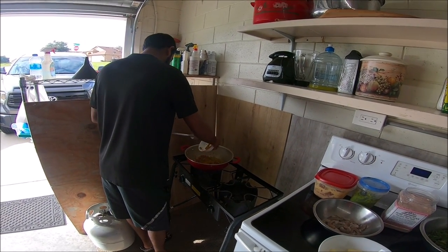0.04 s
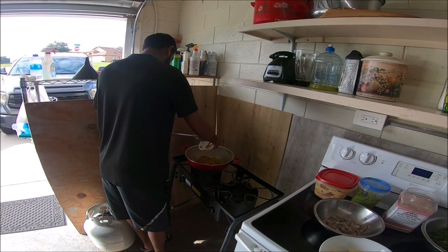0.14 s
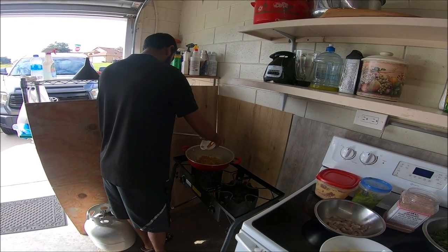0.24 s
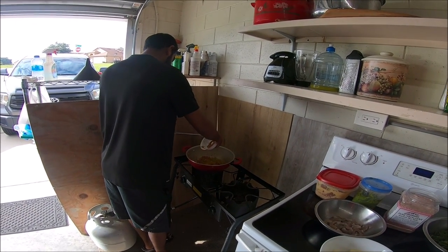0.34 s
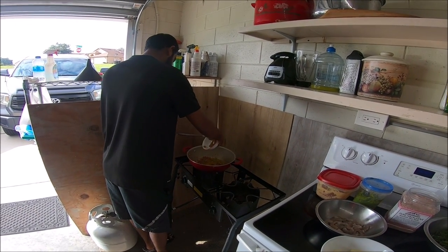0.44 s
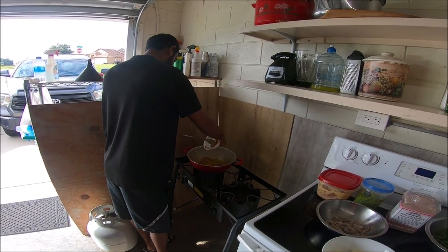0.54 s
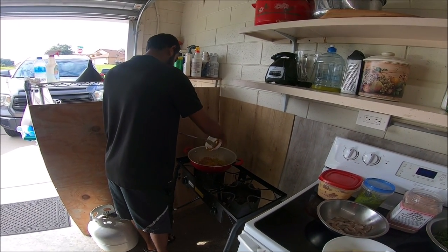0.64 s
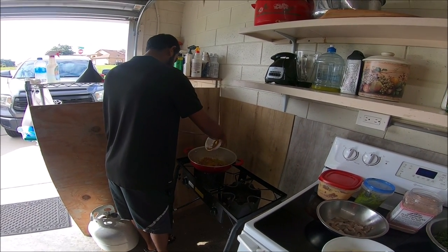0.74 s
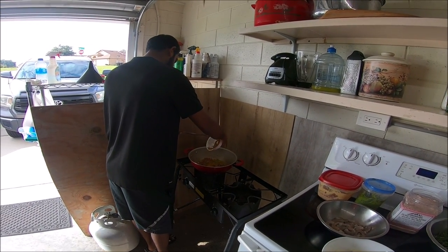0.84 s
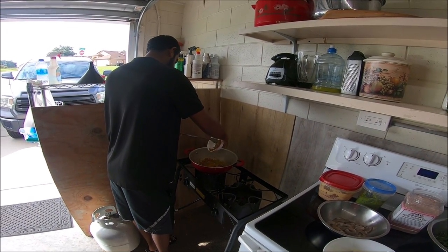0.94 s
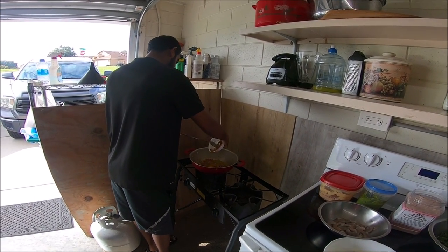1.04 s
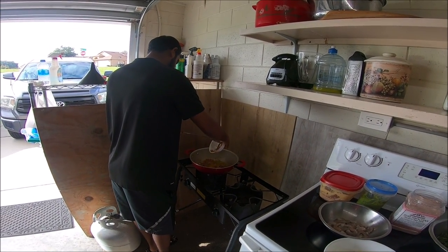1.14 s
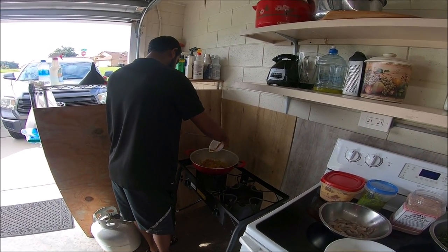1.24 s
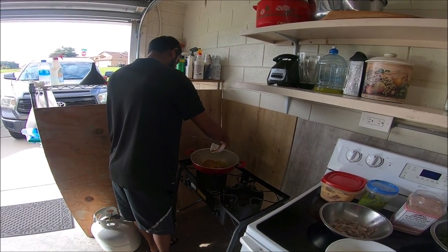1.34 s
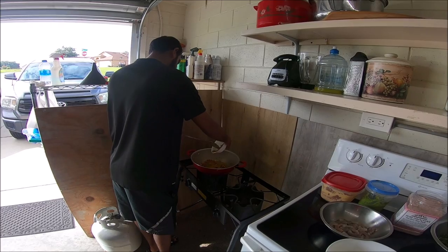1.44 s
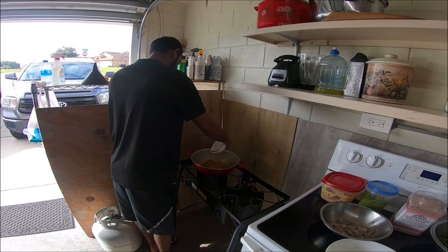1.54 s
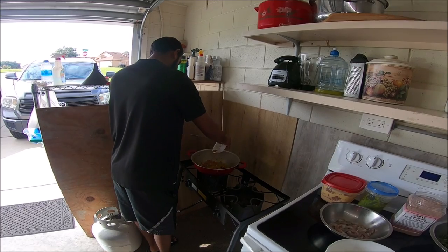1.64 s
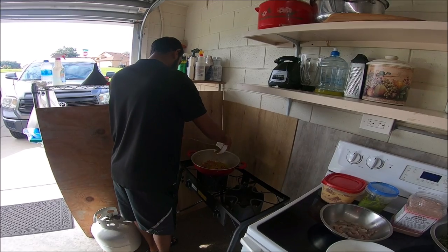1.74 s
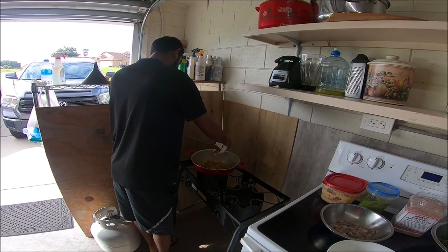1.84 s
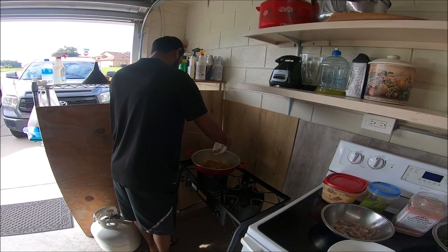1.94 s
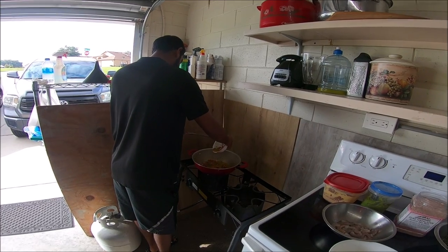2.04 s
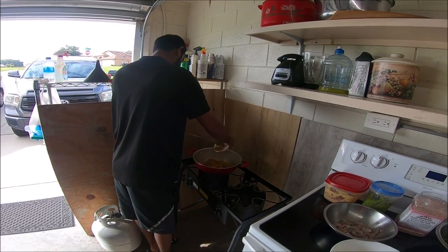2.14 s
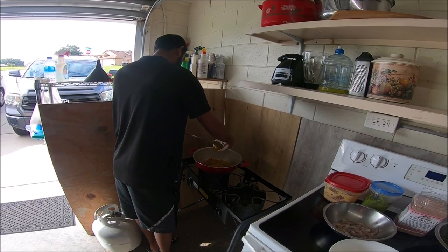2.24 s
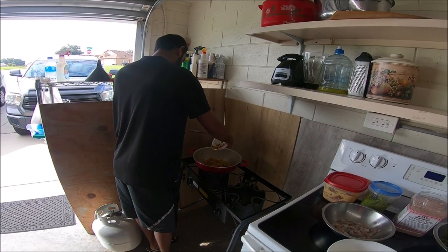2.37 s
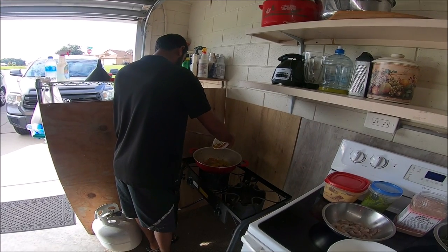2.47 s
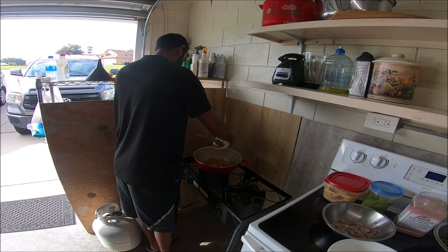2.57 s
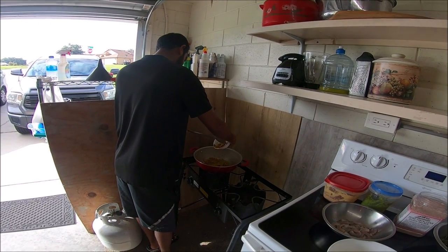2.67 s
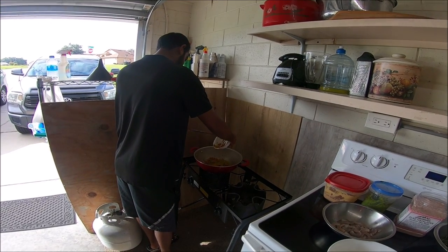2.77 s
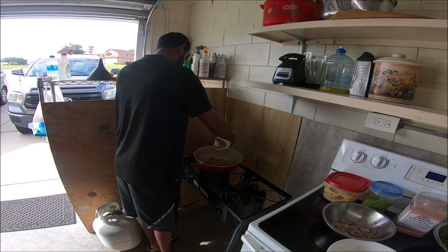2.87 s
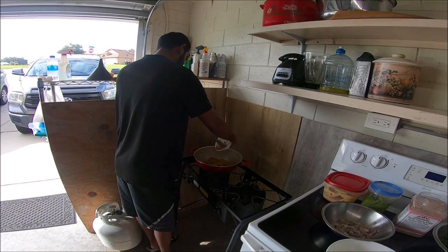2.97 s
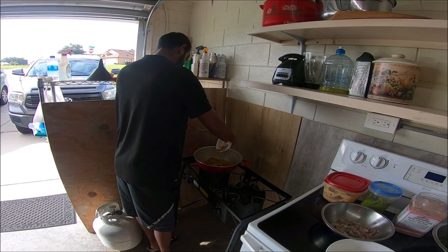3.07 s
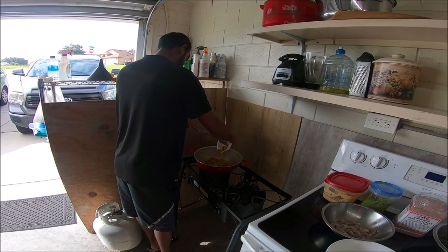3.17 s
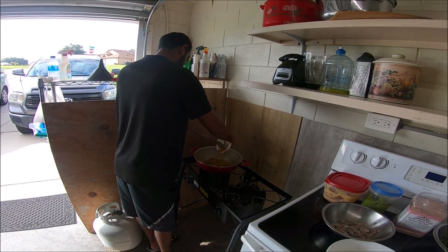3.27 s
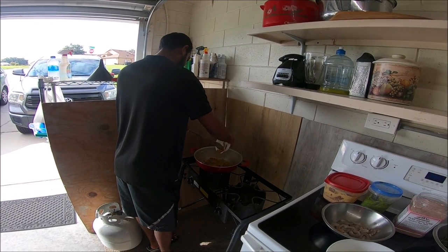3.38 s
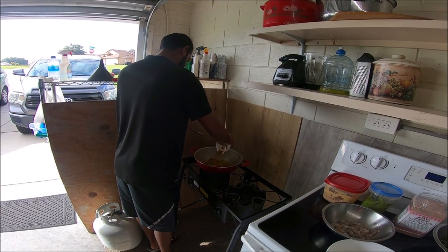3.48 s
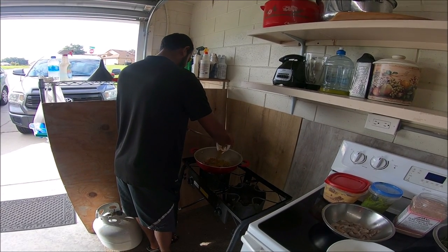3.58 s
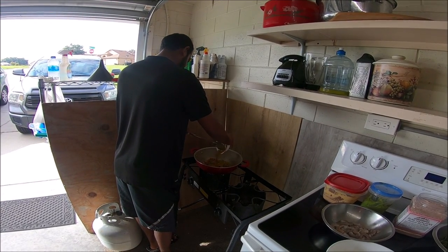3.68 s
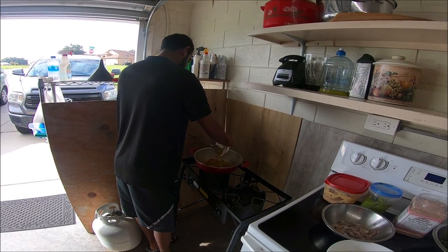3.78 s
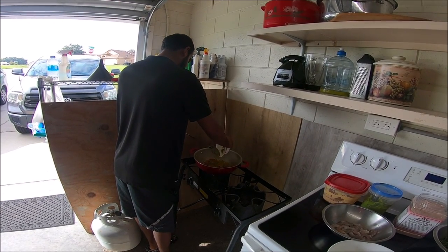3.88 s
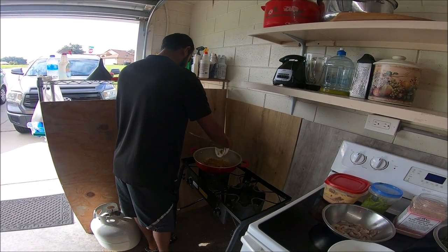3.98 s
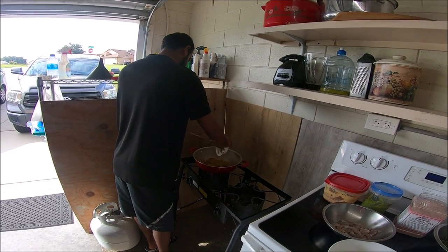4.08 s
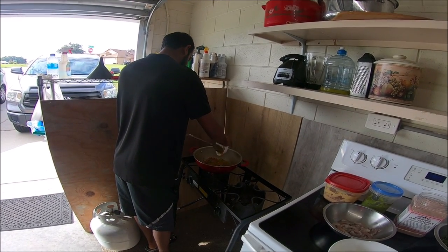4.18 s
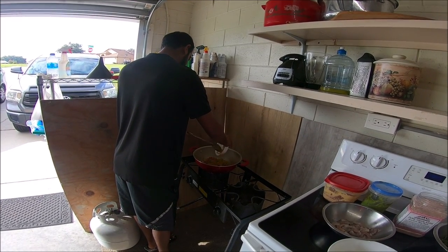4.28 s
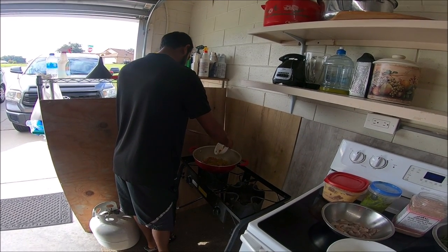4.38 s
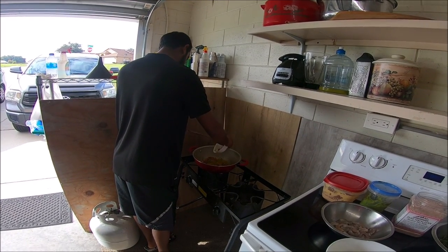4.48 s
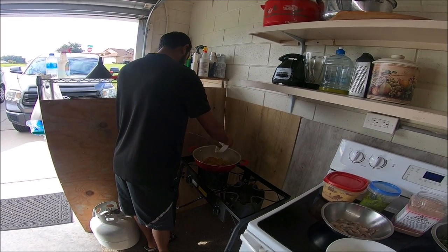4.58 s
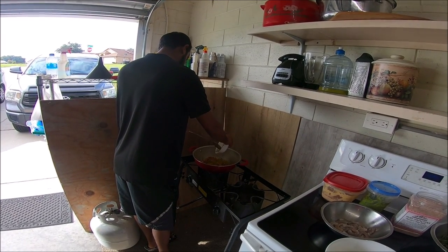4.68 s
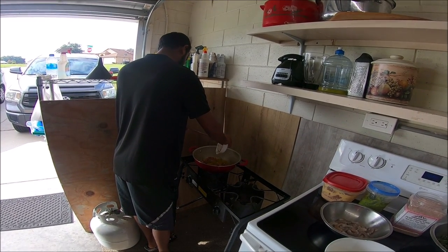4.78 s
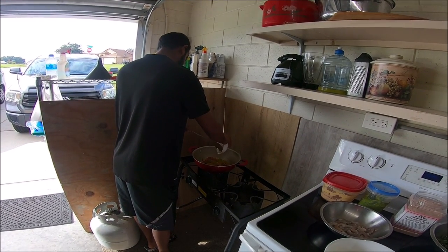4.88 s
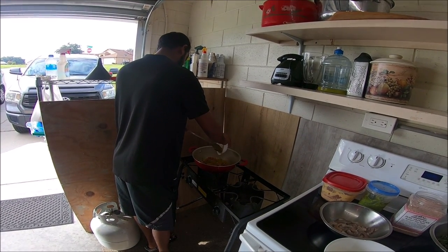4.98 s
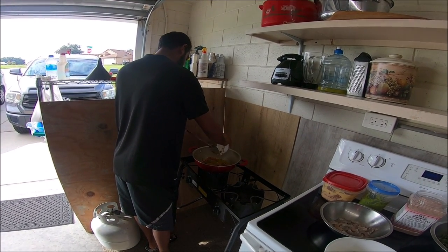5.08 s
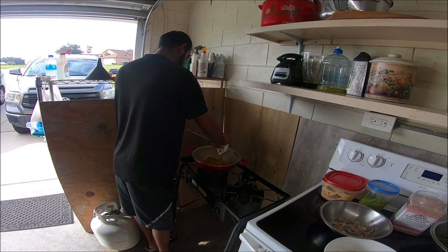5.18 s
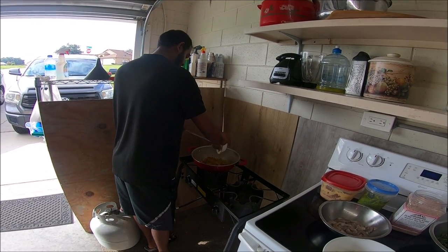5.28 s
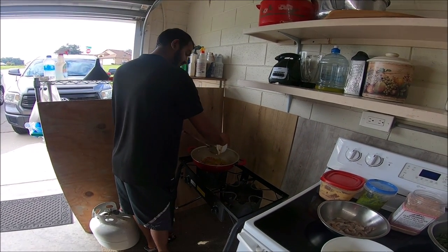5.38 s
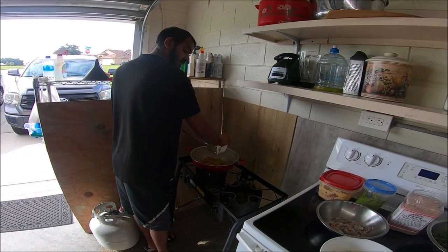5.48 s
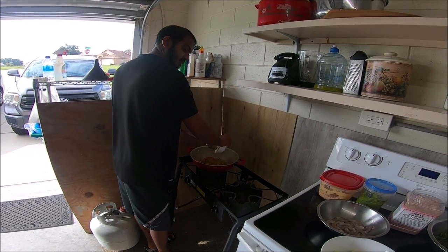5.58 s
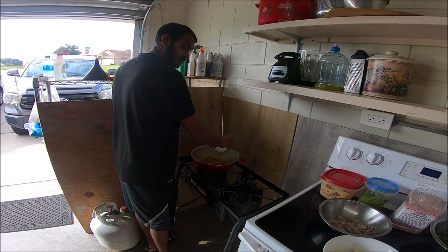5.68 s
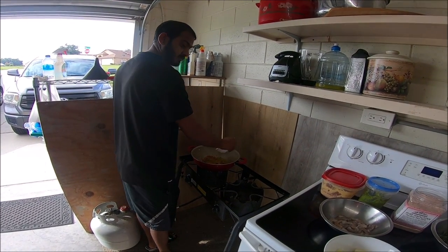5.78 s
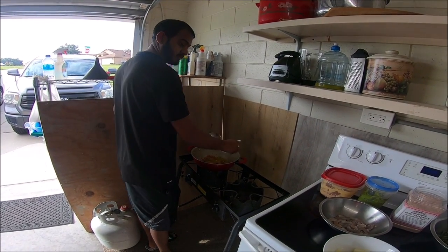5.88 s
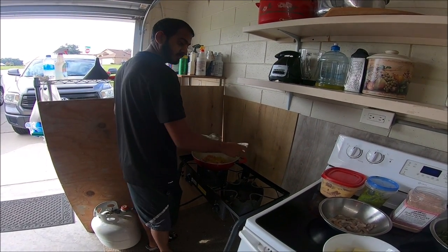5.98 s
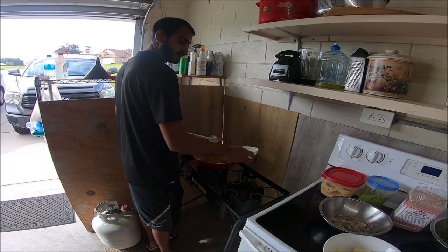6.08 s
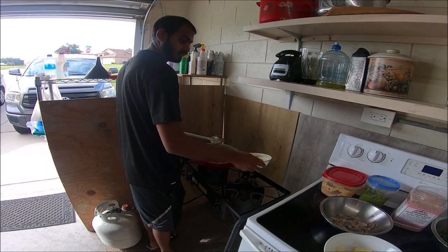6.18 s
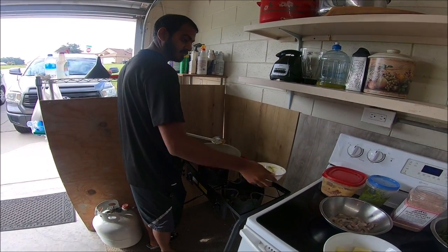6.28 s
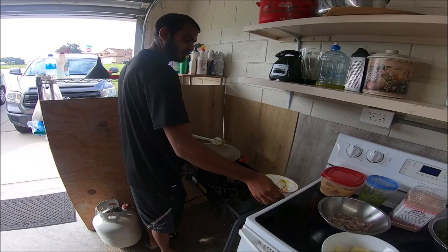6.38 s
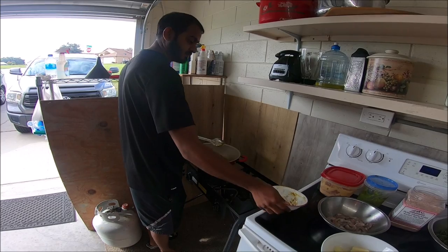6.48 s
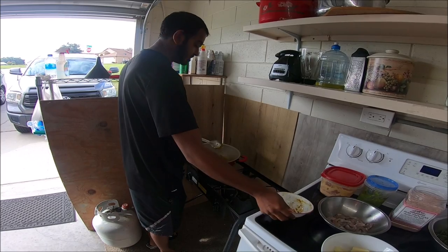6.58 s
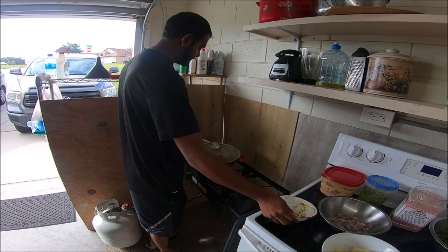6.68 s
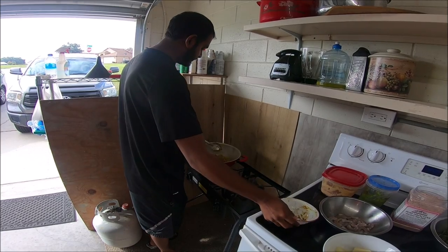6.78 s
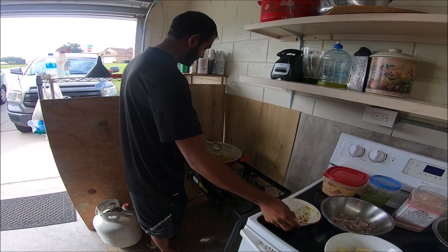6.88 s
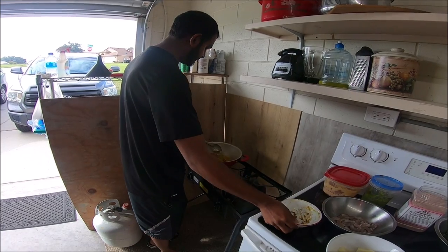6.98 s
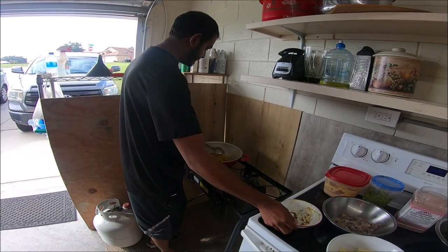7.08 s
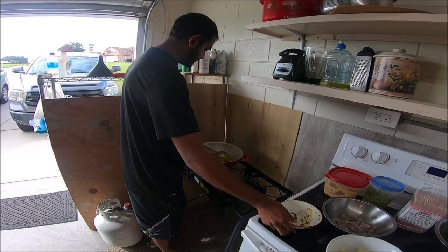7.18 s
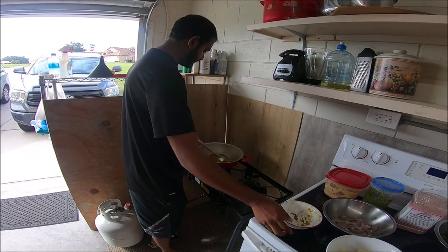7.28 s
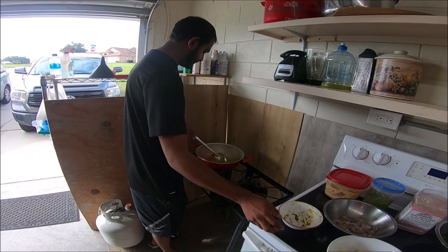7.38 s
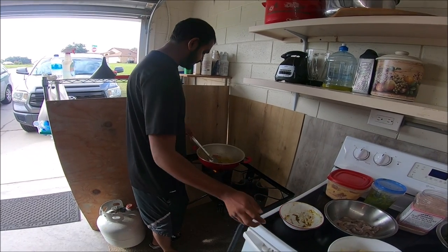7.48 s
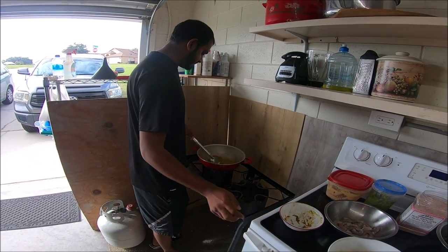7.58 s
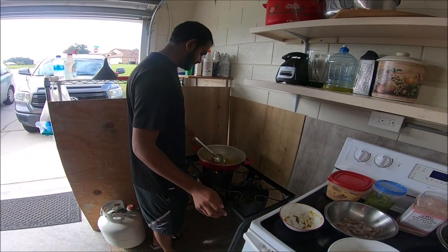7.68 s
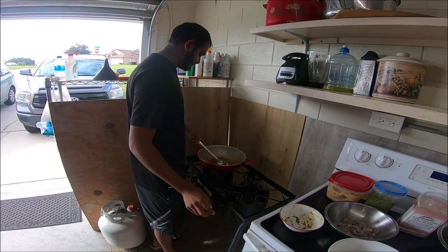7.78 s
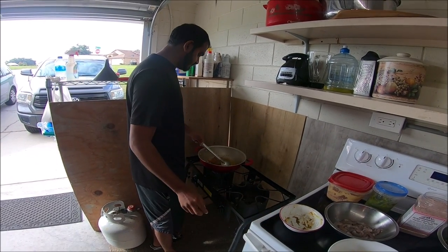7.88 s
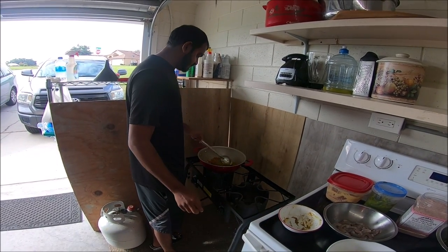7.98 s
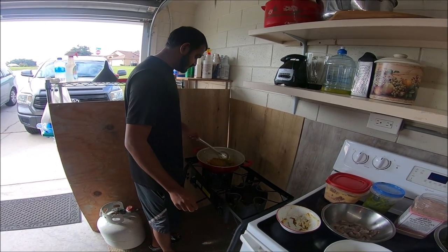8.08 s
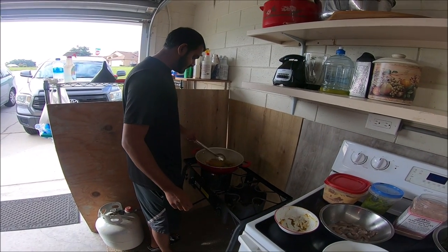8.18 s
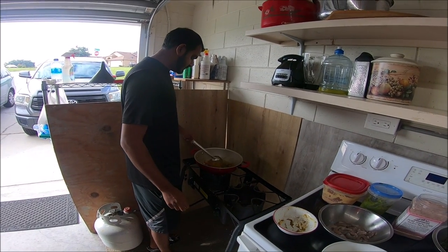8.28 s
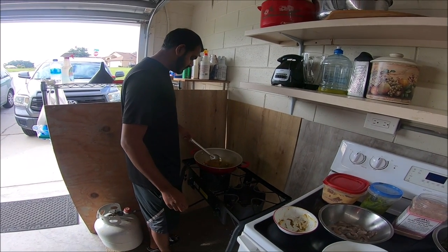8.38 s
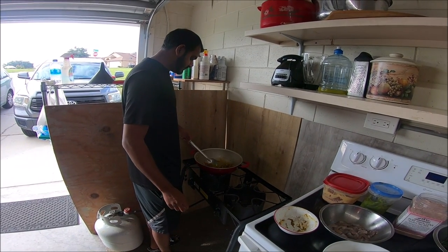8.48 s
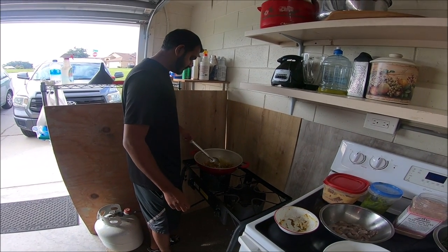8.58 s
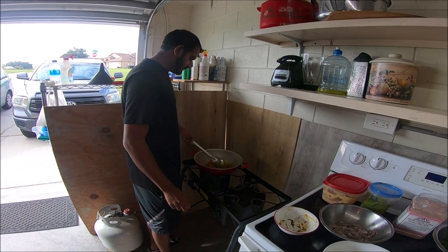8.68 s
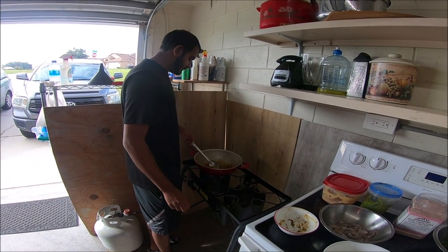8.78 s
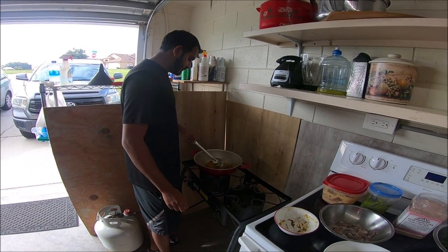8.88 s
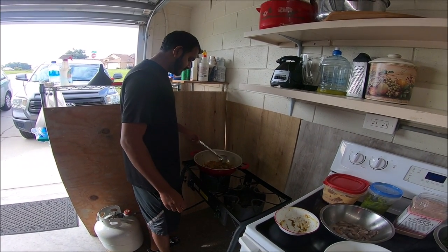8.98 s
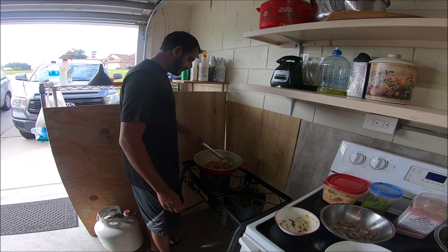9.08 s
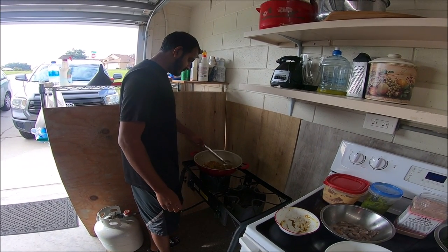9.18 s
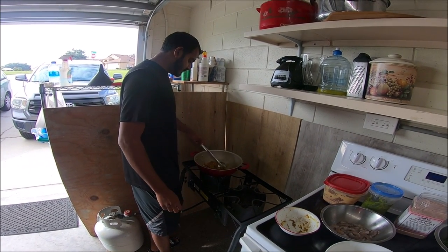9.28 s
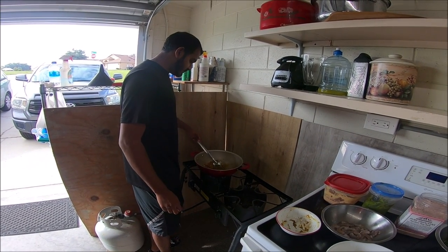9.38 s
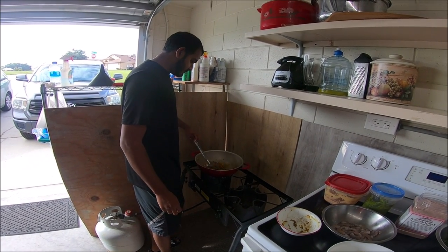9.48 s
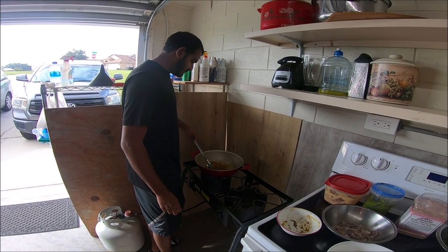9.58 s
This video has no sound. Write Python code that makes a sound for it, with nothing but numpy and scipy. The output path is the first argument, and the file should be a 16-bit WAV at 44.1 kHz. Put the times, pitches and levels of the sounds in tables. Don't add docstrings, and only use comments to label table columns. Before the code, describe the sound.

A nearby stereo microphone hears oil frying with a dense, crackly hiss, and a spoon clanging against a steel pan at uneven intervals. The tapping stops before six seconds; the sizzle dips, rubber soles chirp on concrete, and a plate clacks down with a metallic rattle, settling softly afterwards. From about eight seconds the sizzling is stronger, ending with a short dull spoon drag. The small hard-walled garage adds a short echo over faint low rumble.

```python
import sys
import numpy as np
from scipy import signal
from scipy.fft import rfft, irfft
from scipy.io import wavfile
from scipy.ndimage import uniform_filter1d

SR = 44100
rng = np.random.default_rng(int(sys.argv[2]) if len(sys.argv) > 2 else 0)


def materialize(psi):
    bounded = np.clip(np.atleast_2d(psi).T, -1, 1)
    quanta = np.round(bounded * 32767).astype(np.int16)
    wavfile.write(sys.argv[1], SR, quanta)


def ratio(d):
    e = np.asarray(d, float) / 20
    return 10 ** e


N = 424683
T = np.arange(N) / SR


def level(x, db=0):
    return x * ratio(db) / np.sqrt(np.mean(x ** 2))


def on_log(hz, table):
    f, v = np.transpose(table)
    return np.interp(np.log(np.maximum(hz, 1)), np.log(f), v)


def colour(x, table):
    n = x.shape[-1]
    gain = ratio(on_log(np.fft.rfftfreq(n, 1 / SR), table))
    return irfft(rfft(x) * gain, n)


def band(x, hz, width):
    return signal.lfilter(*signal.iirpeak(hz, hz / width, fs=SR), x)


def walk(rate):
    k = int(SR / rate)
    held = np.repeat(rng.standard_normal(N // k + 1), k)
    return uniform_filter1d(uniform_filter1d(held, k), k)[:N]


def ring(modes, tint_db, scatter_db, t):
    hz, db, t60 = np.transpose(modes)[:, :, None]
    chance = rng.standard_normal((2, len(modes), 1))
    steps = np.repeat(rng.standard_normal((len(modes), len(t) // 300 + 1)), 300, axis=1)[:, :len(t)]
    waver_db = 3 * uniform_filter1d(steps, size=300) * np.minimum(t / 0.01, 1) * np.minimum(hz / 1000, 1)
    decay_db = db + tint_db + scatter_db * chance[0] + waver_db - 60 * t / t60
    return np.sum(ratio(decay_db) * np.sin(2 * np.pi * hz * t + 0.5 * chance[1]), axis=0)


def add(out, s, sound, peak_db, pan_db):
    i = int(s * SR)
    sides = ratio(peak_db + np.array([[pan_db], [-pan_db]]) / 2)
    out[:, i:i + len(sound)] += sides * sound / np.abs(sound).max()


def frying():
    # t/s, fizz level/dB, simmer level below 2 kHz/dB, brightness above 3.5 kHz/(dB per octave)
    heat = [(0.0, -42.5, -51.5, -0.5), (0.37, -43.5, -48, -0.5), (0.62, -44.5, -51.5, -0.5),
            (0.96, -43.5, -51, -0.5), (1.98, -44.5, -50, 0.0), (2.71, -44.5, -52, -1), (3.24, -43, -47, -1),
            (3.46, -45.5, -49.5, -0.5), (3.91, -45.5, -51.5, 0.5), (4.58, -44.5, -50.5, -0.5),
            (5.66, -44.5, -51, -0.5), (6.03, -47, -52.5, 0.5), (6.89, -46, -52, 0.0), (7.11, -46, -50, 1),
            (7.51, -44.5, -53, 2.5), (7.72, -44, -51, 1.5), (7.89, -40.5, -51, -1), (8.39, -39, -49, 0.5),
            (8.98, -41, -50.5, 1), (9.33, -39.5, -51.5, -0.5), (9.63, -43, -51.5, 2.5)]
    # f/Hz, level/dB
    fizz = [(250, -13), (420, -14), (600, -8), (850, -5.5), (1300, -3.5), (1800, -3), (2700, -1.5),
            (4200, -1), (5600, -4.5), (7650, 0), (8500, -8), (10300, -12.5), (11200, -20.5), (15500, -31)]
    # f/Hz, side minus mid level/dB
    fizz_side = [(60, -14), (110, -14), (200, 2), (380, -4.5), (700, -7), (1290, -3), (2380, -8),
                 (4400, -10.5), (8120, -0.5), (15000, 0.5)]
    s, fizz_db, simmer_db, bright_db = np.transpose(heat)
    out, swell = np.zeros((2, N)), walk(9.8)
    for hz in 280 * 2 ** np.arange(0, 5.9, 1 / 3):
        struck = rng.random((2, N)) < 0.3 * hz / SR
        pops = struck * ratio(1.8 * rng.exponential(size=N)) * rng.standard_normal((2, N))
        bubbles = band(rng.standard_normal((2, N)) + level(pops, -1), hz, hz / 4)
        share = np.clip(np.log2(hz / 1500) + 0.12, 0, 1)
        change_db = share * (fizz_db - fizz_db.mean()) + (1 - share) * (simmer_db - simmer_db.mean())
        heat_db = np.interp(T, s, change_db + bright_db * max(np.log2(hz / 3500), 0))
        out += ratio(heat_db + 0.28 * swell + 2.3 * walk(25)) * bubbles
    mid, side = level(colour(out, fizz), np.mean(fizz_db) + 1.5)
    side = colour(side, fizz_side)
    return np.array([mid + side, mid - side]) * ratio(np.array([[-0.2], [0.2]]))


def spoon_taps():
    # t/s, peak level/dB, lowest mode level/dB, share of free ring time
    taps = [(0.286, -7.5, -12, 1), (0.5, -20, -8, 0.65), (0.912, -23, 0, 0.65), (1.324, -7.5, -8.5, 0.74),
            (1.375, -18, -10, 0.8), (1.707, -20, -17, 0.8), (1.748, -17, -13, 0.96), (1.809, -18.5, -3, 1),
            (1.844, -26.5, -5, 0.95), (2.104, -21.5, -9, 0.64), (2.298, -9, -8, 1), (2.887, -14, -15, 0.67),
            (2.984, -30.5, 5, 0.69), (3.194, -9, -11, 0.8), (3.263, -17, -7, 0.84), (3.362, -14, -8, 0.69),
            (3.665, -7.5, -12, 0.93), (4.136, -9.5, -9, 0.99), (4.553, -25.5, 15, 0.54),
            (4.628, -10.5, -9, 0.68), (4.687, -21, -6.5, 0.8), (4.946, -11, -4, 0.63),
            (5.378, -13, -6, 0.76), (5.737, -7, -18.5, 1), (5.79, -20, -18, 0.7)]
    # f/Hz, level/dB, t60/s
    pan = [(676, 0, 0.1), (870, -17, 0.073), (1000, -28, .1), (1250, 1.5, 0.45), (1378, 5.5, 0.19),
           (1600, -28, 0.11), (1710, 8, 0.21), (2200, -22.5, 0.11), (2340, -11.5, .18), (2790, -51.5, 0.17),
           (3030, -33, 0.16), (2960, -28.5, 0.25), (3216, 10.5, 0.24), (3420, -17, 0.29),
           (3090, -21.5, 0.05), (3830, -39.5, .14), (4240, 3, 0.057), (4200, -10, .15), (4880, -1, 0.13),
           (4930, -8, 0.6), (4870, 19, 0.1), (5210, -34, .16), (5930, -26, .25), (6240, 1, 0.16),
           (7300, 16, 0.094), (6740, 10, 0.17), (6530, -2, 0.1), (7100, 0, 0.18), (7560, 8, 0.31),
           (8570, 5, 0.18)]
    # f/Hz, level/dB
    crack = [(300, -24), (450, -26), (620, 12.5), (1500, -2), (3000, -0.5), (5000, 1), (8000, -6),
             (9000, -9.5), (15000, -11)]
    spots_hz = [(1660, 2870, 3100, 4950, 7430), (1380, 2540, 2950, 4380, 5840),
                (1310, 2820, 2990, 4310, 6310), (1720, 2950, 3770, 4870, 5920),
                (1020, 2290, 3100, 4200, 7010), (1530, 2860, 3250, 4990, 7500),
                (1010, 2290, 3150, 5010, 7470), (1000, 2380, 3170, 5040, 7490),
                (1530, 2240, 3140, 4630, 6660), (1330, 2260, 3040, 4900, 7240),
                (1000, 2710, 3300, 4910, 7470), (1320, 2800, 3840, 5220, 6270),
                (1220, 2870, 3160, 5290, 6100), (1730, 2370, 3150, 4890, 7350),
                (1010, 2890, 3240, 4140, 6440), (1010, 2710, 3180, 4870, 7150),
                (1550, 2900, 3140, 4870, 6870), (960, 2830, 3170, 4870, 6680),
                (1720, 2190, 3090, 4280, 7920), (850, 2820, 3020, 4870, 6010),
                (1300, 2830, 3090, 4310, 7590), (1620, 2780, 3140, 5170, 6070),
                (1670, 2230, 3020, 4370, 7530), (1590, 2590, 3120, 4330, 6750),
                (1600, 2800, 3150, 4900, 6750)]
    spots_db = [(-13.5, -1, -1, -3, -4.5), (-2.5, -4, 0, -5, -2.5), (4, 3, -5, -12, -15),
                (-14, 0.5, 1, -7, 2.5), (-5, -2.5, -9, -8, -1.5), (-10, -14, -9.5, -13, 0.5),
                (-11, 1, -3, -5, 1.5), (-1.5, -1.5, -1, -4, -4), (5, -5, -3, -4, -8),
                (-23, -8, -10, -10, -6), (-12.5, -3.5, -5, -5.5, -7.5), (-10.5, -1.5, -15, -13, -14),
                (3, 14, 12, 0, -2), (-19, -7, 1, -7, 0), (-9, -2, -2, -8, -12), (-3, 6.5, 1.5, -2, 1.5),
                (-7.5, -3, -0.5, -5.5, -0.5), (-18, -1.5, 1.5, -7.5, -0.5), (-9, -6, -1, -8, -16),
                (2, -0.5, -2, -9, -6), (5.5, -4, 0, -6, -9), (-9, 4.5, 0.5, 1.5, -2),
                (-14, 0, -2.5, -1.5, -1), (-7, -2, -0.5, -9, -2.5), (-5, -3, -5, -6, -3)]
    out, t = np.zeros((2, N)), np.arange(SR // 3) / SR
    for (s, db, thud_db, free), picks, picks_db in zip(taps, spots_hz, spots_db):
        zones = [(pan[0][0], thud_db), *zip(picks, picks_db)]
        pairs = [(hz * split, g, 0.24) for hz in picks for split, g in ((1, 8), (1.013, 1))]
        modes = np.array(pan + pairs)
        modes[:, 2] *= np.clip(free, 0.05, 2)
        tones = ring(modes, on_log(modes[:, :1], zones), 1.5, t)
        hiss = level(colour(colour(rng.standard_normal(len(t)), crack), zones))
        shimmer = level(sum(band(hiss, hz, hz / 10) for hz in picks))
        noise = hiss * ratio(-9 - 60 * t / 0.035)
        noise = noise + shimmer * ratio(-17 - 60 * t / (0.2 * max(free, 0.05)))
        settle = 0.5 + 0.5 * ratio(-60 * np.maximum(t - 0.008, 0) / 0.03)
        add(out, s, tones * settle / np.abs(tones).max() + noise, db - 0.5, -0.7)
    return out


def scrapes():
    # t/s, level/dB
    drag_course = [
        (9.12, -52),
        (9.132, -68),
        (9.144, -61),
        (9.254, -50.5),
        (9.348, -37.5),
        (9.402, -43),
        (9.44, -59),
        (9.446, -67),
        (9.48, -60),
    ]
    # f/Hz, level/dB
    drag_modes = [(330, -4), (540, 0.5), (1000, -3.5), (1300, 0.5), (1730, 0), (2000, -13), (2530, -3),
                  (3050, -9), (3720, -9), (4400, -14)]
    slips = rng.standard_normal(N) * ratio(3 * walk(90))
    modes = sum(ratio(db + 5 * walk(22)) * level(band(slips, hz, 48 + hz / 14)) for hz, db in drag_modes)
    course_db = np.interp(T, *np.transpose(drag_course), -120, -120)
    return modes * ratio(course_db - 8.5 + np.array([[-1.5], [1.5]]))


def plate():
    # t/s, peak level/dB, contact time/ms, ring against rattle level/dB
    plate_hits = [
        (6.8936, -7, 0.33, -1.5),
        (7.139, -22.5, 12.4, -14),
    ]
    # f/Hz, level/dB, t60/s
    plate_modes = [(157, 4, .16), (193, -4, 0.124), (269, -14, 0.23), (386, -36, 0.088), (552, -13, 0.22),
                   (846, -24, 0.095), (899, -16, 0.091), (1240, -17, .25), (1840, -11, .15),
                   (2230, -21, .15), (2800, -22, 0.13), (3250, -3, 0.069), (3630, -28, 0.1),
                   (5310, 8, 0.041)]
    # f/Hz, level/dB
    rattle_colour = [(150, -25), (300, 3.5), (600, -5), (1000, 3), (2000, 0.5), (3300, -1), (4500, -16),
                     (8000, -20.5), (12000, -30)]
    out, t = np.zeros((2, N)), np.arange(SR // 2) / SR
    for s, db, contact_ms, ring_db in plate_hits:
        tones = ring(plate_modes, 0, 1, t)
        hiss = level(colour(rng.standard_normal(len(t)), rattle_colour))
        if contact_ms > 5:
            hiss = level(band(hiss, 660, 760))
        late = np.maximum(t - contact_ms / 1000, 0)
        rattle = hiss * (ratio(-8.5 - 60 * late / 0.033) + ratio(-16 - 60 * late / 0.41))
        onset = np.minimum(1000 * t / contact_ms, 1)
        add(out, s, (ratio(ring_db) * tones / np.abs(tones).max() + rattle) * onset, db, -4.5)
    return out


def bursting_seeds():
    # t/s, peak level/dB, f/Hz
    seed_pops = [
        (0.8375, -24.5, 7500),
        (0.9652, -28.5, 2200),
        (2.6539, -32, 3130),
        (3.1324, -41, 7780),
        (5.6431, -28, 3610),
        (5.8654, -33, 6610),
        (6.7191, -29.5, 2540),
    ]
    out, t = np.zeros((2, N)), np.arange(SR // 20) / SR
    for s, db, hz in seed_pops:
        burst = rng.standard_normal(len(t)) * ratio(-60 * t / 0.012)
        add(out, s, band(burst, hz, hz / 4), db + 1, 0)
    return out


def squeaking_soles():
    # t/s, length/s, level/dB, start f/Hz, end f/Hz
    squeaks = [
        (4.459, 0.056, -52, 1754, 1750),
        (5.161, 0.028, -52, 1290, 1310),
        (5.195, 0.059, -47, 1446, 1630),
        (6.026, 0.027, -59, 1340, 1450),
        (6.331, .06, -57, 1496, 1630),
        (6.57, 0.042, -50, 1490, 1540),
        (6.624, 0.028, -56, 1600, 1740),
        (7.334, 0.038, -53, 1600, 1630),
        (7.467, 0.058, -50, 1616, 1700),
    ]
    out = np.zeros((2, N))
    for s, length, db, start_hz, end_hz in squeaks:
        u = np.linspace(0, 1, int(length * SR))
        wobble = uniform_filter1d(rng.standard_normal((2, SR // 8)), size=120)[:, :len(u)]
        hz = (start_hz + (end_hz - start_hz) * u) * (1 + 0.49 * wobble[0])
        swell = np.sin(np.pi * u) * ratio(57 * wobble[1])
        add(out, s, swell * np.sin(2 * np.pi * np.cumsum(hz) / SR), db + 12.5, -3)
    return out


def garage(x):
    t60_s, haze_db, wall_ms, wall_db = 0.25, -10, 5, -4
    ports_hz, low_hz, high_hz = 308, 116, 9800
    t = np.arange(SR // 2) / SR
    response = rng.standard_normal((2, len(t))) * ratio(-60 * t / t60_s) * np.clip(t / 0.018, 0, 1)
    response *= ratio(haze_db) / np.sqrt(np.sum(response ** 2, axis=1, keepdims=True))
    response[:, 0] += 1
    response[:, int(wall_ms * SR / 1000)] += ratio(wall_db)
    left, right = signal.fftconvolve(x, response, axes=1)[:, :N]
    ports = signal.butter(2, ports_hz, "high", fs=SR, output="sos")
    side = ratio(5.5) * signal.sosfilt(ports, left - right)
    heard = np.array([left + right + side, left + right - side]) / 2
    microphone = signal.butter(3, [low_hz, high_hz], "band", fs=SR, output="sos")
    return signal.sosfilt(microphone, heard)


def burner_and_street():
    # t/s, rumble level under 110 Hz/dB, roar level 120-300 Hz/dB
    lows = [(0.0, -63, -50.5), (0.16, -47, -57.5), (0.94, -62, -56.5), (1.04, -52, -57), (1.15, -63, -61),
            (1.26, -54, -53.5), (1.55, -70, -60), (1.74, -56, -57.5), (1.8, -62, -59.5), (2.28, -58, -56.5),
            (2.33, -68, -49), (2.49, -59, -56.5), (2.63, -63, -57.5), (2.71, -54.5, -57),
            (3.03, -54, -59.5), (3.11, -65, -54), (3.16, -54, -73), (3.22, -48, -54), (3.32, -68, -57),
            (3.86, -57, -58), (3.94, -68, -57), (4.21, -56, -58), (4.35, -66, -56), (4.48, -48.5, -58),
            (4.72, -59, -55), (4.77, -50, -52), (4.83, -47, -58), (4.91, -62, -55), (5.25, -60, -61),
            (5.31, -57, -56.5), (5.85, -63, -58), (5.9, -72, -62), (5.98, -59, -57), (6.19, -61, -60),
            (6.49, -57, -55), (6.57, -63, -61.5), (6.76, -58, -56.5), (6.81, -64, -59), (6.95, -44, -43),
            (7.08, -60, -52.5), (7.16, -51.5, -49.5), (7.59, -59.5, -59.5), (7.86, -61, -58.5),
            (7.97, -51.5, -54), (8.13, -62, -61), (8.23, -55, -59), (8.47, -68, -57.5), (8.53, -60, -59),
            (8.64, -62, -57.5), (8.8, -53.5, -60), (9.2, -55.5, -54), (9.63, -56.5, -60)]
    # f/Hz, bandwidth/Hz, level/dB
    rumble = [(55.2, 19, 4), (86, 26, -1.5), (39.4, 21, -10.5)]
    # f/Hz, bandwidth/Hz, level/dB
    roar = [(150.6, 16, -2), (192.8, 37.6, -2), (248.5, 44, -8.5)]
    s, *curves = np.transpose(lows)
    out = 0
    for peaks, db in zip((rumble, roar), curves):
        noise = rng.standard_normal((2, N)) * ratio(np.array([[0], [-18]]))
        booms = 0
        for f, w, g in peaks:
            boom = level(band(band(noise, f, w), f, 2 * w))
            booms = booms + ratio(g + 1.3 * walk(4.08)) * boom
        mid, side = level(booms, -2.66)
        out = out + ratio(np.interp(T, s, db)) * np.array([mid + side, mid - side])
    return out


def scene():
    events = spoon_taps() + scrapes() + plate() + bursting_seeds() + squeaking_soles()
    return frying() + garage(events) + burner_and_street()


def roll_off(x):
    return signal.sosfilt(signal.butter(12, 16320, fs=SR, output="sos"), x)


def record(dry):
    low_pass = signal.ellip(8, 0.2, 70, 15700, fs=SR, output="sos")
    mix = signal.sosfilt(low_pass, dry)
    return roll_off(mix)


dry = scene()
out = record(dry)
materialize(out)
```